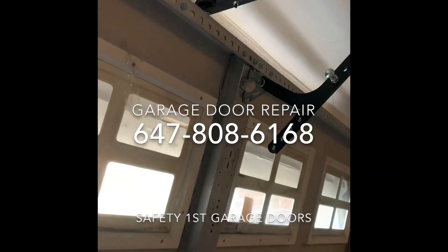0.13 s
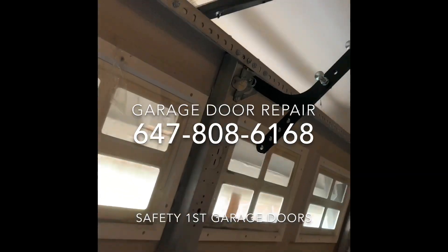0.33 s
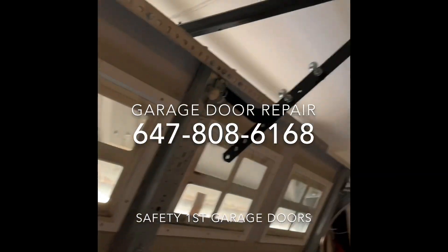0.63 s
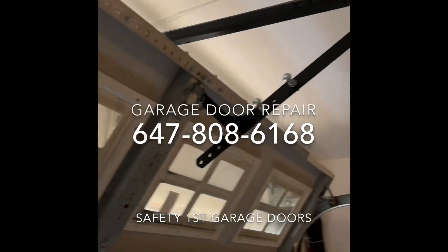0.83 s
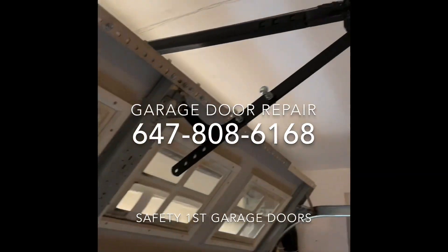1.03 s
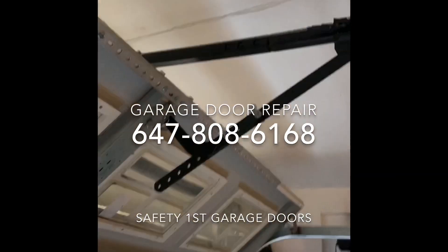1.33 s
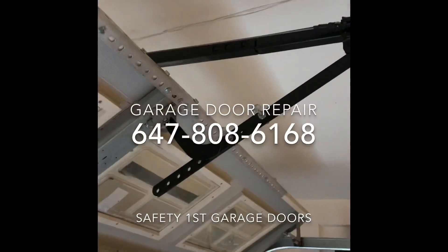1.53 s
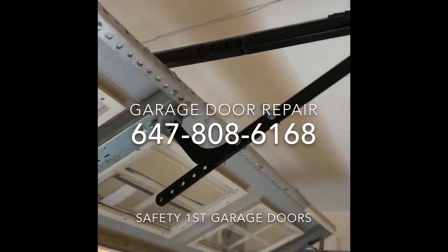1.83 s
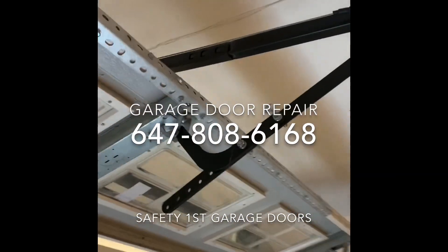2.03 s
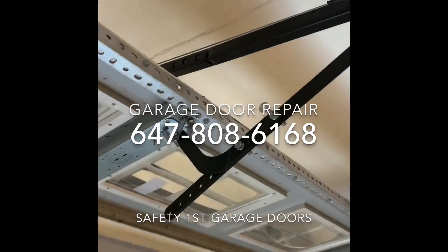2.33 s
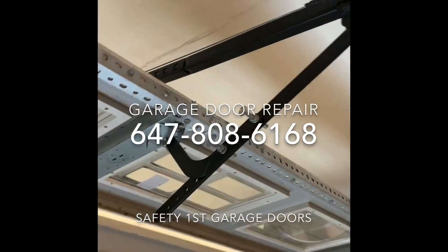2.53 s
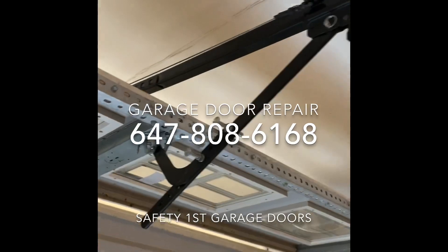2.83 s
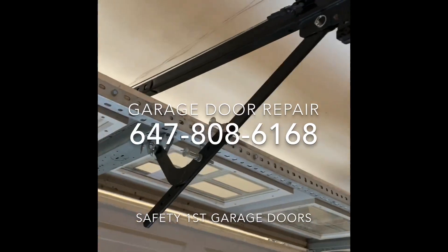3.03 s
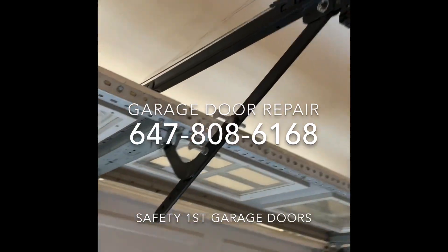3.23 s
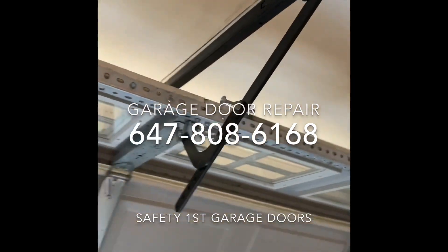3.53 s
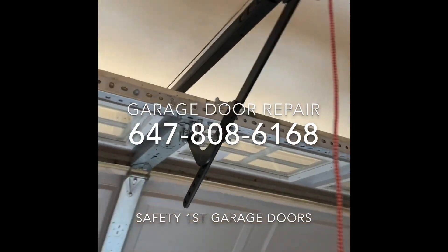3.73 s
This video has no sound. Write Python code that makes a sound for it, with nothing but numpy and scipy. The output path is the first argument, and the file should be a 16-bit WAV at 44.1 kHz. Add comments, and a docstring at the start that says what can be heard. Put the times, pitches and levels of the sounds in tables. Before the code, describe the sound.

A motorised garage door rumbles and rattles along its steel track, with clanks and heavy late thumps.

```python
"""An electric opener hauls a sectional garage door up its steel tracks, heard from just below.
From the start a motor hums, its drive throbs and rollers rattle over the rumbling panels; near half
a second small ticks and the first hinge clanks and panel thump follow. Then scrapes and a short high
squeak come, the steel arm rattles as the door tips overhead, and the heaviest thumps and a longer
squeak end it. Steady tones make the motor, shaped noise and tiny hits the rest, in a small hard garage."""
import sys
import numpy as np
from scipy import signal
from scipy.io import wavfile

SR = 44100
rng = np.random.default_rng(int(sys.argv[2]) if len(sys.argv) > 2 else 0)


def wrap_up_sound(samples):
    """Save the sound to the file named by the first command line argument, as 16-bit audio."""
    columns = np.atleast_2d(samples).T
    # keep every value between -1 and 1, then stretch to whole-number steps
    tamed = np.clip(columns, -1, 1)
    steps = np.round(tamed * 32767).astype(np.int16)
    wavfile.write(sys.argv[1], SR, steps)


N = 171549
T = np.arange(N) / SR  # time of every sample [s]

SHAFT_HZ = 29.75  # turns of the drive shaft per second
TRACK_DB = -36  # usual loudness of the track's ringing against the room tail [dB]
# colour of sliding steel: (frequency [Hz], relative level [dB])
SLIDING_COLOUR = [(900, 9.5), (3500, 9.5), (5200, -1), (7500, 4), (10500, -1.5), (11800, -20.5)]


def amp(db):
    """Turns decibels into a gain."""
    return 10 ** (np.asarray(db) / 20)


def unit(x):
    """Scales a signal to an rms (average strength) of 1."""
    return x / np.sqrt(np.mean(x ** 2) + 1e-20)


def level(points):
    """Gain over time, drawn in straight dB lines between (time [s], level [dB]) points."""
    return amp(np.interp(T, *np.transpose(points)))


def read(points, hz):
    """Reads a curve of (frequency [Hz], value) points on a log-frequency axis."""
    f, value = np.transpose(points)
    return np.interp(np.log(hz + 1), np.log(f + 1), value)


def add(mix, s, sound):
    """Mixes a sound into the mix, starting at s seconds."""
    part = mix[..., max(round(s * SR), 0):][..., :sound.shape[-1]]
    part += sound[..., :part.shape[-1]]


def colour(x, points, tilt_db=0, keep_power=True, size=4096):
    """Filters with the given spectrum, never sounding ahead of the input; the tilt is in dB per octave."""
    hz = abs(np.fft.fftfreq(size, 1 / SR))
    tilt = tilt_db * np.log2(np.maximum(hz, 500) / 1000)  # flat below 500 Hz
    gain = amp(read(points, hz) + tilt)
    # minimum phase: the filter responds as early as it can
    spectrum = np.exp(np.conj(signal.hilbert(np.log(gain))))
    taps = np.fft.ifft(spectrum).real[:size // 2]
    if keep_power:
        taps = taps / np.linalg.norm(taps)
    return signal.oaconvolve(np.atleast_2d(x), taps[None], axes=1)[:, :x.shape[-1]]


def drift(rate_hz, count=24):
    """Random wandering, rms 1: a sum of sines from a tenth of the rate up to the rate."""
    hz, t = np.geomspace(rate_hz / 10, rate_hz, count), T[::100]
    waves = np.sin(2 * np.pi * (hz[:, None] * t + rng.random((count, 1))))
    return np.interp(T, t, unit(waves.sum(0)))


def grains(per_s, spread_db):
    """Random tiny impacts of uneven size and either sign, rms 1."""
    size = amp(spread_db * np.minimum(rng.exponential(1, N), 4))
    struck = rng.random(N) < per_s / SR
    return unit(size * rng.choice([-1, 1], N) * struck)


def tone(hz, waver, rate_hz):
    """A steady pitch wavering in strength and phase, as centre and side signals."""
    turning = np.exp(2j * np.pi * (hz * T + rng.random((2, 1))))
    wander = 1 + waver * (drift(rate_hz) + 1j * drift(rate_hz))
    return unit((turning * wander).real)


def motor():
    """The mains shakes the motor into hum and buzz; the shaft's turning and the drive add tones and throb."""
    # mains hum: (time [s], level [dB])
    hum_level = [(0, -32.5), (.7, -40), (1.25, -34), (1.58, -38), (1.65, -29.5), (1.95, -34), (2.28, -30.5),
                 (2.7, -31.5), (3.89, -33.5)]
    # the housing sings an octave above, louder as it nears: (time [s], level [dB])
    octave_level = [(1.1, -46.5), (1.5, -43), (2.8, -39.5)]
    # buzz of the housing: (multiple of the hum, average level [dB])
    buzz_orders = [(3, -46.5), (4, -60)]
    # tones of the turning shaft: (multiple of the shaft speed, level [dB])
    shaft_orders = [(6, -54), (10, -56.5), (12, -52), (13, -52), (20, -55.5)]
    # throb of the drive: (time [s], level [dB])
    throb_level = [(.12, -29.5), (.19, -62), (.31, -62), (.38, -30.5), (.74, -40.5), (.85, -34),
                   (1.5, -32.5), (1.6, -49), (1.78, -35.5), (2.7, -43)]
    hum_hz, throb_hz = 120, 57  # the hum is at twice the mains frequency

    hum = level(hum_level) * tone(hum_hz, waver=0.056, rate_hz=12)
    octave = level(octave_level) * tone(2 * hum_hz, waver=.05, rate_hz=6)
    buzz = sum(amp(db) * tone(k * hum_hz, waver=.25, rate_hz=6) for k, db in buzz_orders)
    # the buzz follows the octave, rising half as many dB
    buzz = unit(np.sqrt(level(octave_level))) * buzz
    shaft = sum(amp(db) * tone(k * SHAFT_HZ, waver=0.92, rate_hz=7.3) for k, db in shaft_orders)
    throb = level(throb_level) * tone(throb_hz, waver=.15, rate_hz=6)
    return hum + octave + buzz + shaft + throb


def panels():
    """The door rumbles, shaken once per turn of the shaft; its sections thump as they flex and shudder on."""
    # rumble: (time [s], level [dB])
    rumble_level = [(.1, -38), (.35, -39), (1, -35.5), (2.9, -34), (3.25, -36), (3.48, -33), (3.8, -36)]
    # its colour: (frequency [Hz], relative level [dB])
    rumble_colour = [(15, -2), (35, -15), (72, -3), (105, -2.5), (220, -7.5), (400, -12.5), (650, -19),
                     (3000, -60.5)]
    # flexing sections: (time [s], level of the push [dB], pitch [Hz])
    thumps = [(0.619, -25, 147), (2.286, -22, 91.5), (2.556, -14, 72.2), (3.002, -16.5, 76),
              (3.067, -22, 68), (3.107, -20.5, 81.4), (3.448, -16.5, 67), (3.511, -22.5, 70)]
    flutter = 0.11  # depth of the shaking
    push_s, shudder_s = 0.006, 0.034  # time until each swell is strongest [s]
    shudder_db = -12  # shudder against push [dB]

    shake = 1 + flutter * np.sin(2 * np.pi * SHAFT_HZ * T)
    out = level(rumble_level) * shake * colour(rng.standard_normal((2, N)), rumble_colour)
    t = T[:SR // 4]
    push_swell = (t / push_s * np.exp(1 - t / push_s)) ** 2
    shudder_swell = t / shudder_s * np.exp(1 - t / shudder_s)
    for s, db, hz in thumps:
        push = push_swell * np.sin(2 * np.pi * hz * t)
        shudder = shudder_swell * tone(hz, waver=2.3, rate_hz=hz / 2)[0, :len(t)]
        add(out, s, amp(db) * (push + amp(shudder_db) * shudder))
    return out


def rollers():
    """Many tiny impacts make a lumpy rattle in the track, a brighter one in the arm, and the drive's hiss."""
    # rollers running in the track: (time [s], level [dB])
    roll_level = [(0, -45), (.42, -46.5), (1.9, -44.5), (2.6, -42), (3.89, -48)]
    # their colour: (frequency [Hz], relative level [dB])
    roll_colour = [(150, -12.5), (350, 3.5), (800, 2.5), (2000, -2.5), (2700, -16.5), (3900, -23),
                   (5200, -20), (8000, -19), (13000, -101)]
    # the steel arm rattles once the door tips overhead: (time [s], level [dB])
    arm_level = [(1.9, -70), (2.1, -49), (3.89, -51)]
    # its colour: (frequency [Hz], relative level [dB])
    arm_colour = [(900, -22), (1750, 5.5), (2600, -1.5), (4000, -7), (5200, -32.5)]
    # hiss of the sliding drive: (time [s], level [dB])
    hiss_level = [(.45, -53.5), (2.5, -52.5), (3.72, -49), (3.89, -56)]
    rattles_per_s, spread_db = 420, 3.5

    lumps = amp(1 * drift(22))  # 1 dB of unevenness, wandering at up to 22 Hz
    rattle = colour(grains(rattles_per_s, spread_db) * level(roll_level) * lumps, roll_colour)
    arm = colour(grains(rattles_per_s, spread_db) * level(arm_level) * lumps, arm_colour)
    hiss = colour(grains(3000, spread_db=6.5) * level(hiss_level), SLIDING_COLOUR)
    rattling = garage(rattle + arm, wet_db=8, ring_db=TRACK_DB, steady=True)
    return rattling + garage(hiss, wet_db=8.0, ring_db=-10, steady=True)


def clanks():
    """Each loose hinge strikes, chatters and rings briefly at its own pitches; small parts tick close by."""
    # hinge and roller clanks: (time [s], level [dB], treble tilt [dB per octave])
    hinge_blows = [(0.487, -41.5, 5.5), (.499, -38.5, 0.5), (.842, -40, -3), (.866, -35.5, 0.5),
                   (.925, -38, -1), (.952, -37, -2), (.99, -48, -1), (1.031, -46, 0.5), (1.183, -39.5, -7),
                   (1.287, -38.5, -0.5), (1.451, -41.5, 2), (1.497, -38, 1), (1.545, -43, 4),
                   (1.598, -39, 0), (1.912, -49.5, 2), (2.032, -42, -2), (2.115, -42.5, 5),
                   (2.192, -36, -5), (2.653, -39, -1.5), (2.979, -42.5, -2.5), (3.157, -41, -5),
                   (3.294, -34.5, -3), (3.786, -40.5, -3.5)]
    # their colour: (frequency [Hz], relative level [dB])
    clank_colour = [(100, -35), (400, 6), (1000, 4.5), (1650, 1.5), (2150, -1.5), (2800, -5), (4000, -7.5),
                    (5200, -19), (7500, -20.5), (12500, -42)]
    # small sharp metal ticks: (time [s], level [dB])
    small_ticks = [(.484, -54), (0.567, -55.5)]
    # their colour: (frequency [Hz], relative level [dB])
    tick_colour = [(2000, -29), (5500, 6), (7900, 8), (15000, -12)]
    chatter_per_s, chatter_share = 300, .75  # rate of the later hits, and their size against the first
    chatter_s, tick_s = .014, 0.0015  # time to fade to about a third [s]
    hinge_ring = .5  # ringing against hits

    out, ticks, t = np.zeros((1, N)), np.zeros(N), T[:SR // 6]
    blow = np.sqrt(SR / 20)  # a blow holds the energy of 50 ms at its level
    fade = np.exp(-t / chatter_s)
    for s, db, tilt in hinge_blows:
        struck = rng.random(len(t)) < chatter_per_s / SR
        hits = chatter_share * rng.standard_normal(len(t)) * struck * fade
        hits[0] = 1
        pitches = rng.uniform(650, 2000, size=(4, 1))  # [Hz]
        ring = np.sin(2 * np.pi * pitches * t).sum(0) * fade
        knock = colour(hits / np.linalg.norm(hits), clank_colour, tilt)
        knock = knock + hinge_ring * ring / np.linalg.norm(ring)
        add(out, s, blow * amp(db) * knock / np.linalg.norm(knock))
    for s, db in small_ticks:
        crack = rng.standard_normal(len(t)) * np.exp(-t / tick_s)
        add(ticks, s, blow * amp(db) * crack / np.linalg.norm(crack))
    ticks = colour(ticks, tick_colour)
    return garage(out, wet_db=9, ring_db=-23) + garage(ticks, wet_db=0, ring_db=TRACK_DB)


def scrapes():
    """Roller flanges rub the track in gritty swells of friction; thin squeaks sound where a roller binds."""
    # scrapes: (peak time [s], rise [s], fall [s], peak level [dB])
    flange_scrapes = [(1.35, 0.032, 0.03, -47.5), (1.5, 0.068, 0.073, -39), (2.195, 0.1, 0.048, -40.5),
                      (2.362, 0.0042, 0.044, -41.5)]
    # squeaks: (peak time [s], half length [s], pitch [Hz], peak level [dB])
    roller_squeaks = [(1.491, 0.0046, 7740, -35), (3.713, 0.05, 3250, -47.5)]
    wobble = 0.011  # share of the pitch

    force = np.zeros(N)
    for s, rise, fall, db in flange_scrapes:
        force += amp(db) * np.exp(-np.maximum((s - T) / rise, (T - s) / fall))
    grit = colour(grains(2500, spread_db=8) * force, SLIDING_COLOUR)
    slip = np.cumsum(1 + wobble * drift(200)) / SR  # time running unevenly, so the pitch wobbles
    squeaks = np.zeros(N)
    for s, length, hz, db in roller_squeaks:
        squeaks += amp(db) * np.exp(-((T - s) / length) ** 2) * np.sin(2 * np.pi * hz * slip)
    return garage(grit, wet_db=4, ring_db=TRACK_DB) + squeaks


def garage(x, wet_db, ring_db, steady=False):
    """Adds ringing track and a fading room tail to the direct sound, as centre and side signals."""
    # ringing pitches of the steel track: (frequency [Hz], relative level [dB])
    track_modes = [(1082, 3.5), (1391, -1), (3243, -14), (3876, -2.5)]
    # how long the room rings: (frequency [Hz], time to fade by 60 dB [s])
    room_fade = [(1000, 0.33), (4000, 0.23), (12000, 0.25)]
    track_fade_s = 0.1  # time for the track to fade by 60 dB [s]

    t = np.arange(SR // 2) / SR
    # room tail: noise that fades at its own speed in each frequency band
    hz, at, z = signal.stft(rng.standard_normal((2, len(t))), SR, nperseg=256)
    fading = z * amp(-60 * at / read(room_fade, hz)[:, None])
    tail = signal.istft(fading, SR, nperseg=256)[1][:, :len(t)]
    ring = sum(amp(db) * np.sin(2 * np.pi * (f * t + rng.random((2, 1)))) for f, db in track_modes)
    ring = ring * np.exp(-np.log(1000) * t / track_fade_s)
    echo = tail / np.linalg.norm(tail[0]) + amp(ring_db) * ring / np.linalg.norm(ring[0])
    echo = amp(wet_db) * echo
    echo[0, 0] += 1  # direct sound in the centre
    echo[1, 4] -= 1  # and in the side, four samples later and upside down
    # a steady sound already fills the room at the start
    lead = np.pad(x, ((0, 0), (len(t), 0)), "reflect" if steady else "constant")
    heard = signal.fftconvolve(lead, echo / np.linalg.norm(echo[0]), axes=1)
    return heard[:, len(t):len(t) + N]


def scene():
    """Sums all sources and spreads them to left and right: centre plus side, and centre minus side."""
    # gain of the side signal: (frequency [Hz], level [dB])
    width = [(60, -76), (120, -26), (380, -7.5), (700, -2.5), (2400, -5), (5000, 6.5), (7800, -12),
             (12500, 9)]
    balance_db = 0.5  # the right channel's gain over the left [dB]

    mid, side = motor() + panels() + rollers() + clanks() + scrapes()
    side = colour(side, width, keep_power=False)[0]
    left = (mid + side) * amp(-balance_db / 2)
    right = (mid - side) * amp(balance_db / 2)
    return np.array([left, right])


def record(dry):
    """Removes the highest treble with a steep low-pass filter."""
    taps = signal.firwin(511, 15800, window=("kaiser", 9), fs=SR)  # cutoff in Hz
    return signal.oaconvolve(dry, taps[None], "same")


dry = scene()
out = record(dry)
wrap_up_sound(out)
```